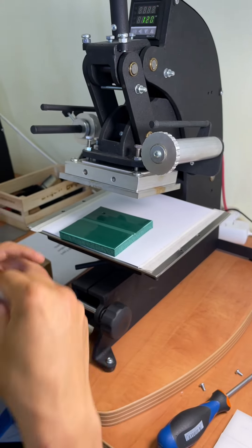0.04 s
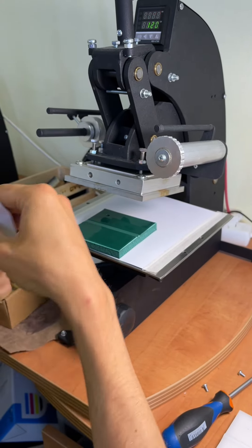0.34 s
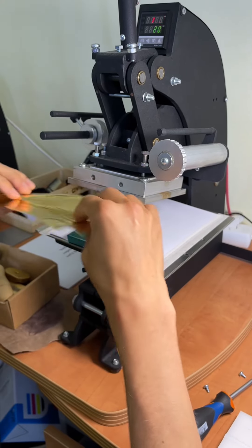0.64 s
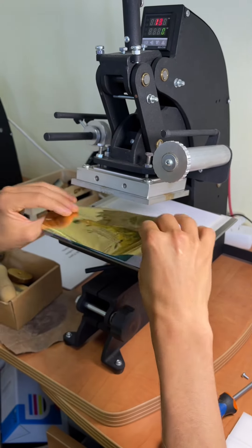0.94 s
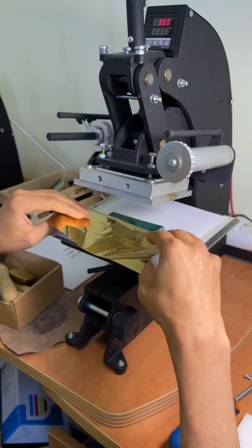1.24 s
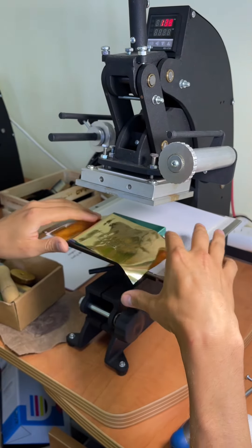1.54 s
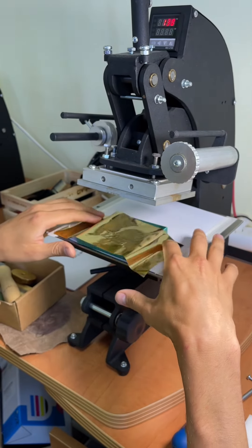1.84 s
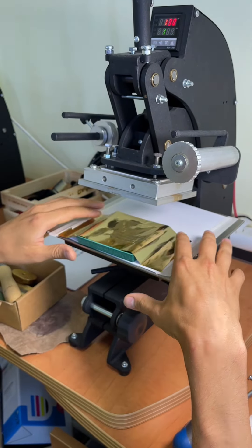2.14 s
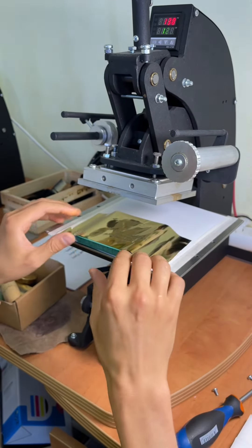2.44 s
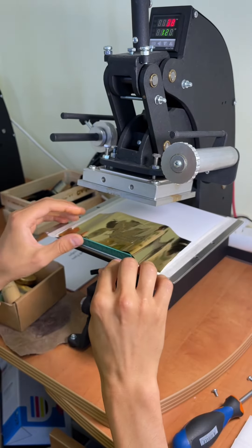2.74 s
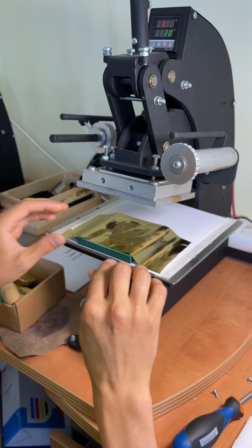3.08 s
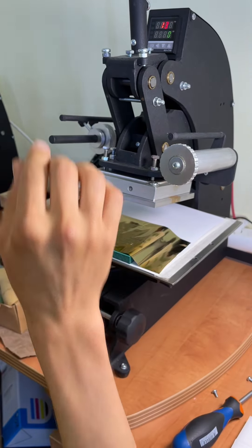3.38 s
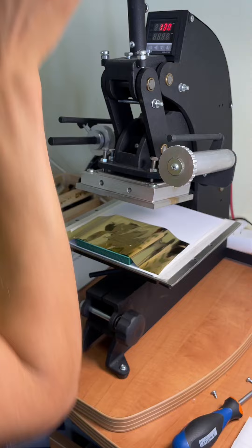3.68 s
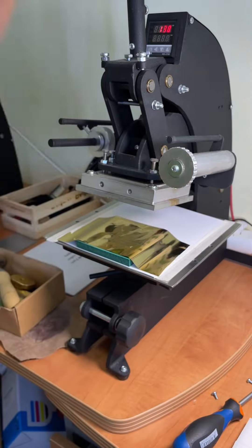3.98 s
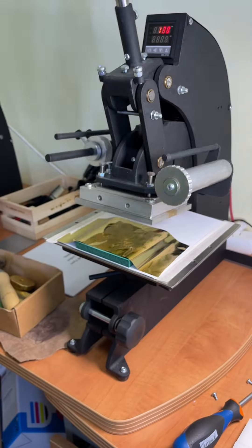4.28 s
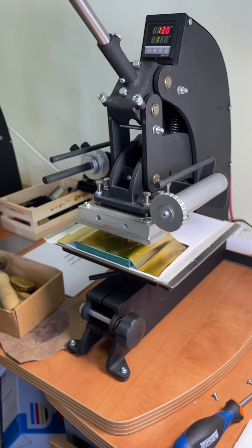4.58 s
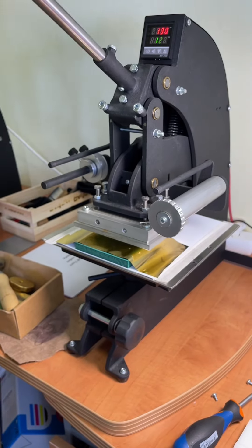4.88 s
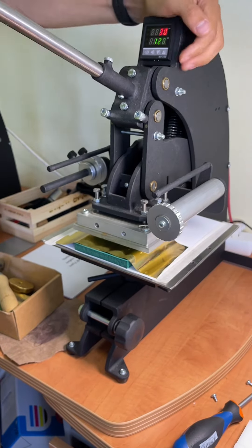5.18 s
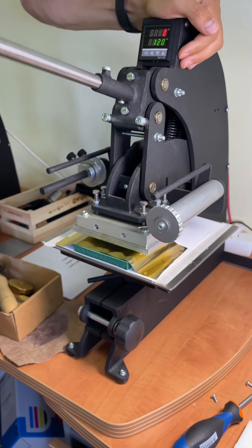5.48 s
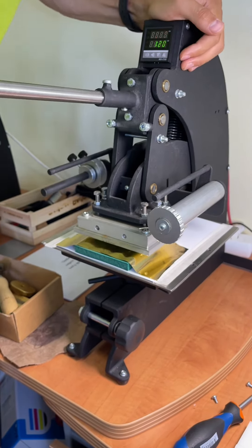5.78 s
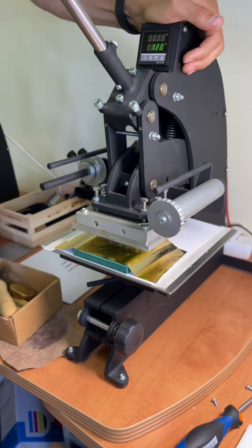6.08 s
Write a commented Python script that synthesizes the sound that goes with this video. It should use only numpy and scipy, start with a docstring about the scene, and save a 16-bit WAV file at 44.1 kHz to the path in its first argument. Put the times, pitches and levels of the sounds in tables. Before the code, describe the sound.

Crisp foil crackling and soft rubbing give way to thuds and loud metallic clacks as a press lever is pulled down.

```python
"""Stamping foil in a hand press

In a small workshop, thin foil is laid on a press. It crinkles and snaps as its creases pop
through, while hands and clothes rub. The lever is pulled and jolts make the bench thud.
The head knocks onto the die (the stamping block), the joints grind and squeak as the load
builds, and the linkage clacks against its stop. A faint hum lies under it all."""
import sys
import numpy as np
from scipy import signal
from scipy.fft import rfft, irfft, next_fast_len
from scipy.io import wavfile

SR = 44100
rng = np.random.default_rng(int(sys.argv[2]) if len(sys.argv) > 2 else 0)


def output_pcm(signal):
    """Save a mono or channel-first signal as 16-bit PCM at the path in sys.argv[1].

    Samples are clipped to [-1, 1] before scaling.
    """
    pcm = np.clip(np.atleast_2d(signal).T, -1, 1) * 32767
    wavfile.write(sys.argv[1], SR, np.round(pcm).astype(np.int16))


N = 274288

# Levels in the tables are relative: gains and filters further on set the final loudness.
# the tone of the workshop air: (frequency [Hz], level [dB])
AIR_COLOUR = [(15, -53.5), (25, -18), (60, -8.5), (160, -18.5), (197, -16.5), (450, -27), (850, -29),
              (1780, -43), (8470, -66), (12300, -54), (14000, -79.5)]
# mains hum and a neighbouring tone: (pitch [Hz], level [dB])
HUM_TONES = [(60, -66.5), (193.8, -69.5)]
# the sheet is picked up, drawn over the die, lowered, lined up, smoothed and let go:
# (time [s], length [s], level [dB])
FOIL_MOVES = [(.008, 0.0028, -48.5), (.08, 0.011, -56.5), (.335, 0.047, -41.5), (.447, 0.017, -38.5),
              (.52, 0.016, -38.5), (.6, 0.093, -45.5), (.74, 0.1, -50.5), (.94, 0.016, -55),
              (1.0, 0.12, -64.5), (1.21, 0.26, -62), (1.32, 0.026, -67), (1.54, 0.017, -57.5),
              (1.748, 0.092, -55), (1.94, 0.085, -66), (2.09, 0.014, -60), (2.19, 0.074, -56.5),
              (2.625, 0.016, -77.5), (2.76, 0.017, -74.5)]
# big creases popping, each in a flurry of small ones: (time [s], snap level [dB], flurry level [dB])
FOIL_SNAPS = [(0.062, -37.5, -58), (.089, -41, -47.5), (0.154, -40, -59), (0.173, -44, -77),
              (.186, -41, -54.5), (0.199, -48, -56), (.259, -48, -59), (0.285, -42, -65),
              (.327, -10.5, -30), (.423, -18.5, -49), (.44, -28, -50), (0.504, -22.5, -42.5),
              (.536, -15, -50), (.547, -17, -55), (0.659, -20, -45.5), (.695, -23, -50),
              (0.811, -21, -39.5), (.915, -44, -75), (1.033, -34, -54), (1.046, -41, -56),
              (1.091, -35, -68), (1.183, -57, -55), (1.534, -32, -50.5), (1.558, -35, -57),
              (1.564, -26, -67), (1.713, -45, -54), (1.733, -31.5, -41), (1.82, -45, -79),
              (1.901, -45, -70), (1.951, -44, -72), (2.009, -38.5, -63), (2.136, -40, -73)]
# borders of the bands in which folds of different size sound: (frequency [Hz])
FOLD_EDGES = [150, 1200, 2400, 3600, 5200, 6800, 8500, 10500, 12200]
# the tone of the foil: (frequency [Hz], level [dB])
FOIL_COLOUR = [(150, -43.5), (400, -8), (1100, -9), (2200, -5.5), (3100, -5.5), (4300, -2.5), (6500, -0.9),
               (8500, 1), (9600, -2.5), (11000, 5.5), (12200, -5.5), (13500, -21.5), (15000, -34.5)]
# a hand brushes off the sheet, later shifts on the press: (time [s], length [s], level [dB])
HAND_BRUSHES = [(2.205, 0.038, -59), (5.98, .2, -61)]
# arm and shirt reach for the lever and pull it: (time [s], level [dB])
ARM_MOVES = [(3.0, -83), (3.19, -67), (3.26, -64), (3.55, -60), (3.85, -59.5), (4.02, -57.5), (4.15, -61),
             (4.24, -50), (4.31, -58.5), (4.68, -65), (4.85, -57.5), (5.15, -61.5), (5.2, -67), (5.38, -65)]
# the tone of rubbing skin and cloth: (frequency [Hz], level [dB])
RUB_COLOUR = [(120, -13.5), (300, 10), (800, 2.5), (1300, 0.5), (2300, 0), (3300, -2.5), (5000, -6.5),
              (7500, -2.5), (9500, -6.5), (11000, 3), (12000, -20), (13000, -44.5), (15000, -63)]
# hands and sheet scuff the bed, hands grip the lever: (time [s], length [s], level [dB], pitch [Hz])
SCUFFS = [(0.853, 0.17, -68, 2440), (2.21, .055, -59.5, 1800), (3.246, 0.041, -51.5, 450),
          (3.252, 0.024, -65, 2300), (3.309, 0.014, -58.5, 1140), (3.468, 0.038, -54.5, 384),
          (3.827, 0.033, -54.5, 604), (4.044, 0.014, -53, 557), (4.127, 0.0071, -53.5, 516),
          (4.227, 0.031, -59, 2200), (4.302, .02, -61, 1680)]
# the bed plate singing: (time [s], level [dB], pitch [Hz], swell time [s])
PLATE_TONES = [(2.235, -53, 303, 0.029)]
# jolts passing from the head down the frame into the bench:
# (time [s], head level [dB], frame level [dB], bench level [dB], head pitch [Hz], frame pitch [Hz])
JOLTS = [(2.251, -53, -79, -60, 295, 141), (3.243, -37.5, -46, -46, 337, 168),
         (3.315, -44, -57, -34.5, 537, 139), (3.904, -34.5, -39.5, -36, 303, 128),
         (4.112, -61, -56, -41, 302, 139), (4.284, -51, -45, -32, 300, 134),
         (4.82, -51, -40.5, -34.5, 330, 165), (4.849, -63, -35.5, -38.5, 332, 132),
         (5.398, -25, -13, -27, 354, 149.4), (5.575, -22, -28, -31, 280, 113),
         (5.58, -30, -15, -26, 250, 108), (5.6, -32, -19, -23.5, 472, 169),
         (5.666, -15.5, -10.5, -34, 416, 176), (5.675, -19, -49, -45, 347, 173),
         (5.718, -22, -30, -32.5, 325, 145), (5.981, -32.5, -26, -34, 315, 160),
         (6.135, -30, -42, -30.5, 334, 138)]
# the notes of the bench top: (pitch [Hz], level [dB], time to fade by 60 dB [s])
BENCH_MODES = [(59.5, -2, 0.52), (155.7, -0.5, 0.28), (178, -2, 0.094), (193, 7.5, 0.14),
               (241.9, 2.5, 0.27), (325, 2.5, 0.15), (474, 4.5, 0.2)]
# the head and its pivots knock on die and guides: (time [s], level [dB], contact time [s])
HEAD_KNOCKS = [(3.175, -55.5, 0.003), (4.258, -46, 0.0062), (4.457, -55, 0.0026), (4.517, -53, 0.0017),
               (4.545, -51, 0.0014), (4.589, -55, 0.003), (5.111, -53.5, 0.028), (5.238, -58, 0.004),
               (5.3925, -39, 0.023), (5.397, -16.5, 0.0029), (5.405, -29.5, 0.012), (5.571, -27, 0.004),
               (5.578, -26, 0.005), (5.596, -33, 0.0025), (5.626, -28, 0.0014), (5.971, -41.5, 0.0078),
               (5.977, -34, 0.014), (6.024, -40.5, 0.0056), (6.135, -42.5, 0.0018), (6.19, -49, 0.0025)]
# the tone of those knocks: (frequency [Hz], level [dB])
HEAD_COLOUR = [(120, -5), (400, -7), (650, 2.5), (1000, 0.5), (1400, 0.5), (1950, 3), (2550, -0.5),
               (3300, -9), (4200, -4), (7500, -14.5), (11000, -15), (12400, -25), (14000, -60),
               (16000, -84)]
# the notes of the steel head: (pitch [Hz], level [dB], time to fade by 60 dB [s])
HEAD_MODES = [(804, 8, 0.24), (865, 10, 0.21), (1003, 19.5, 0.065), (1180, 10, 0.12), (1652, 8.5, 0.37),
              (1691, 8, 0.44), (1953, 22.5, 0.039), (2295, 17.5, 0.046), (2630, 26, 0.018),
              (2910, 10, 0.098)]
# the lever swings down, then eases back: (time [s], length [s], level [dB])
LEVER_SWINGS = [(4.0, 0.496, -63), (4.8, 0.42, -64), (6.05, 0.23, -49)]
# dry steel squeaking: (time [s], level [dB], pitch [Hz], swell time [s])
SQUEAKS = [(4.222, -50, 2410, .012), (4.257, -45, 865, 0.0092), (5.576, -21.5, 2522, 0.0058),
           (5.592, -26, 3320, .0016), (5.62, -27, 10930, 0.011), (5.622, -17, 8420, 0.0046),
           (5.645, -32, 2910, 0.0048), (5.66, -37, 3170, 0.0051)]
# the joints slip as the die takes the load: (time [s], length [s], grind level [dB], crush level [dB])
JOINT_SLIPS = [(5.576, 0.0079, -32, -34), (5.594, 0.0035, -30.5, -24), (5.66, 0.0037, -34, -35)]
# the tone of the grinding joints: (frequency [Hz], level [dB])
GRIND_COLOUR = [(60, -10.5), (200, 0), (500, -2.5), (900, -9), (1800, -12.5), (2900, -16), (4500, -22.5),
                (8000, -43), (13000, -75)]
# the tone of the hiss of crushed foil: (frequency [Hz], level [dB])
CRUSH_COLOUR = [(1000, -8), (3500, -9), (6300, -4), (8000, -2.5), (8550, -2), (9500, -7), (10500, 7),
                (10900, -26), (11500, 5.5), (12600, -34), (14500, -69)]
# the linkage ticks against its stop, lands with its full weight and chatters:
# (time [s], crack level [dB], contact time [s], clack level [dB])
STOP_KNOCKS = [(5.745, -9, 0.0034, -29), (5.7471, -19.5, 0.0024, -3.5), (5.7504, -32, 0.0015, -26),
               (5.754, -15.5, 0.002, -10.5)]
# the tone of the cracks at the stop: (frequency [Hz], level [dB])
STOP_COLOUR = [(150, -49), (600, -9.5), (1000, -2), (1500, -6), (2400, 9), (3300, -7), (4300, 3),
               (5300, -4.5), (7300, 3), (9300, -5), (11300, -1.5), (13000, -23.5), (15500, -38)]
# the notes of the lever: (pitch [Hz], level [dB], time to fade by 60 dB [s])
LEVER_MODES = [(736, -11.5, 0.24), (968, 1.5, 0.086), (1810, 4.5, 0.23), (2128, -10, .13), (2230, -4, .1),
               (2440, -6, .11), (2550, 4, 0.1), (2650, -14, 0.12), (3240, 2.5, 0.12), (8060, -14, 0.048)]
# how long the room echoes: (frequency [Hz], time to fade by 60 dB [s])
ROOM_DECAY = [(80, 0.52), (250, 0.48), (700, 1), (2000, 0.41), (6000, 0.46), (12000, 0.25)]
# how far the two microphone openings are out of step: (frequency [Hz], phase [radians])
PORT_PHASE = [(0, 0), (2330, 0.2), (3010, 1.1), (4130, 0.9), (4570, 1.9), (5250, 5.0), (5680, 6.2),
              (6200, 6.4), (8350, 9.2), (9560, 9.5), (11800, 12.3), (13800, 12.6), (14000, 13.2),
              (15900, 15.9)]

TIME = np.arange(N) / SR


def amp(db):
    """Turn decibels into a gain to multiply by."""
    return 10 ** (np.asarray(db) / 20)


def unit(x):
    """Scale a sound to an average strength (rms) of 1."""
    return x / np.sqrt(np.mean(x ** 2))


def add(track, s, sound):
    """Mix a sound into a track, starting at s seconds."""
    start = max(int(s * SR), 0)
    track[start:start + len(sound)] += sound[:max(N - start, 0)]


def band(x, low_hz, high_hz, order=2):
    """Keep what lies between two frequencies."""
    return signal.sosfilt(signal.butter(order, [low_hz, high_hz], "band", fs=SR, output="sos"), x)


def cut_bass(x, hz, order):
    """Weaken what lies below a frequency."""
    return signal.sosfilt(signal.butter(order, hz, "high", fs=SR, output="sos"), x)


def through(x, response):
    """Pass a sound through an object, given its response to one click (scaled to energy 1)."""
    return signal.oaconvolve(x, response / np.linalg.norm(response))[:N]


def colour(x, points, size=2048):
    """Shape a sound's tone to follow (frequency [Hz], level [dB]) points."""
    hz, db = np.transpose(points)
    bins = np.arange(size // 2 + 1) * SR / size
    gains = amp(np.interp(np.log(bins + 1), np.log(hz), db))
    cepstrum = irfft(np.log(gains))
    # keeping only the first half makes the filter answer after a click, never before it
    fold = 1 + np.sign(size / 2 - np.arange(size))
    fold[0] = 1
    return through(x, irfft(np.exp(rfft(cepstrum * fold))))


def waver(per_s):
    """A smooth random wobble of about 1 either way."""
    knots = np.arange(0, N / SR + 1, 1 / per_s)
    return unit(np.interp(TIME, knots, rng.standard_normal(len(knots))))


def gesture(s, length_s, attack_s, release_s):
    """A gain that rises to 1 at time s, holds and dies away."""
    return np.exp(-np.maximum(s - TIME, 0) / attack_s - np.maximum(TIME - s - length_s, 0) / release_s)


def movements(rows, attack_s=0.019, release_s=0.017):
    """The speed of a hand as a gain, from (time [s], length [s], level [dB]) rows."""
    return sum(amp(db) * gesture(s, length_s, attack_s, release_s) for s, length_s, db in rows)


def grains(per_s, spread_db):
    """Random clicks of uneven size."""
    size = amp(spread_db * np.clip(rng.standard_normal(N), -2, 2))
    return unit((rng.random(N) < per_s / SR) * size * rng.choice([-1, 1], N))


def burst(decay_s, size=8192):
    """A rough contact: a fading spray of tiny hits, equally strong at every frequency."""
    spray = rng.choice([-1, 1], size) * np.exp(-TIME[:size] / decay_s)
    flattened = irfft(np.exp(1j * np.angle(rfft(spray))))
    return np.linalg.norm(spray) * flattened[:size // 2]


def swells(rows):
    """Short tones that grow and fade, from (time [s], level [dB], pitch [Hz], swell time [s]) rows."""
    track, t = np.zeros(N), TIME[:SR // 4]
    for s, db, hz, swell_s in rows:
        envelope = (t / swell_s * np.exp(1 - t / swell_s)) ** 2
        add(track, s, amp(db) * envelope * np.sin(2 * np.pi * hz * t))
    return track


def ring(x, modes):
    """A shaken object rings with its own fading notes, called modes."""
    t = TIME[:SR // 2]
    notes = sum(amp(db) * np.sin(2 * np.pi * hz * t) * np.exp(-np.log(1000) * t / fade_s)
                for hz, db, fade_s in modes)
    return through(x, notes)


def cracks(rows, crack_colour):
    """Metal meets metal: one rough crack for each (time [s], level [dB], contact time [s]) row."""
    track = np.zeros(N)
    for s, db, contact_s in rows:
        add(track, s, amp(db) * burst(contact_s))
    return colour(track, crack_colour)


def ringing(blows, modes):
    """A struck part rings on after each (time [s], level [dB]) blow."""
    track = np.zeros(N)
    for s, db in blows:
        add(track, s, [amp(db)])
    return band(ring(track, modes), 67, 8700, order=4)


def background(air_db=-60.5, hum_gain_db=-1):
    """Low, steady workshop air with a faint hum."""
    air = amp(air_db) * unit(colour(rng.standard_normal(N), AIR_COLOUR, size=8192))
    hum = sum(amp(db) * np.sqrt(2) * np.sin(2 * np.pi * hz * TIME) for hz, db in HUM_TONES)
    return air + amp(hum_gain_db) * hum


def creasing(rise_s=0.0049, fall_s=0.0074):
    """How busily the sheet creases: under moving fingers, and in a flurry around each snap."""
    flurries = sum(amp(db) * gesture(s, 0, rise_s, fall_s) for s, _, db in FOIL_SNAPS)
    return movements(FOIL_MOVES) + flurries


def foil(crinkle_db=-1.5, clump_db=0.7, shift_db=3.5, tick_db=-41, snap_db=-5):
    """Tiny creases crackle in clumps as the sheet bends; bigger ones pop through one by one."""
    busy = creasing()
    clumps = amp(crinkle_db + clump_db * waver(per_s=200))
    creases = clumps * busy * grains(per_s=2000, spread_db=0.5)
    # the tone shifts as the folds change size
    creases = sum(amp(shift_db * waver(per_s=45)) * band(creases, low, high, order=3)
                  for low, high in zip(FOLD_EDGES, FOLD_EDGES[1:]))
    # lone crisp ticks stand out when the sheet is barely moved
    pops = amp(tick_db) * np.sqrt(busy) * grains(per_s=84, spread_db=8)
    # only the big snaps, added next, reach the highest treble
    creases, pops = band([creases, pops], FOLD_EDGES[0], FOLD_EDGES[-1], order=6)
    for s, db, _ in FOIL_SNAPS:
        add(pops, s, amp(db + snap_db) * burst(decay_s=0.0009))
    # a single crease gives off little bass
    return colour(creases + cut_bass(pops, hz=3500, order=1), FOIL_COLOUR)


def rubbing(arm_db=2.5, uneven_db=1.0, brush_db=9.0, fingertip_db=-44):
    """Skin and cloth slide with a fine, grainy hiss under uneven pressure."""
    times, levels = np.transpose(ARM_MOVES)
    arm_speed = amp(np.interp(TIME, times, levels, left=-np.inf, right=-np.inf))
    arm = amp(arm_db + uneven_db * waver(per_s=49)) * arm_speed
    brushes = amp(brush_db) * movements(HAND_BRUSHES)
    # the fingertips' hiss grows more slowly than the crinkling they cause
    fingertips = amp(fingertip_db) * np.sqrt(creasing())
    return colour((arm + brushes + fingertips) * grains(per_s=9000, spread_db=4.0), RUB_COLOUR)


def scuffing(width_octaves=0.82, attack_s=0.0032, release_s=0.0054):
    """Short, coarse scrapes, each at the pitch of the part that is touched."""
    track, edge = np.zeros(N), 2 ** (width_octaves / 2)
    for s, length_s, db, hz in SCUFFS:
        scrape = unit(band(grains(per_s=610, spread_db=2.5), hz / edge, hz * edge))
        track += amp(db) * gesture(s, length_s, attack_s, release_s) * scrape
    return track


def bed_plate():
    """The plate under the foil sings briefly as the hand slides off it."""
    return swells(PLATE_TONES)


def thuds(thud_db=-2.5, ring_db=-20, roughness=0.39, shudder_db=6.5, head_swell_s=0.0033,
          frame_lag_s=0.00943, frame_swell_s=0.0084,
          bench_lag_s=0.0209, bench_swell_s=0.018, bench_hz=72.7):
    """Each jolt rocks the head, then the heavy frame, then the bench, whose top rings on."""
    head = swells([(s, db, hz, head_swell_s) for s, db, _, _, hz, _ in JOLTS])
    frame = swells([(s + frame_lag_s, db, hz, frame_swell_s) for s, _, db, _, _, hz in JOLTS])
    bench = swells([(s + bench_lag_s, db, bench_hz, bench_swell_s) for s, _, _, db, _, _ in JOLTS])
    # loose parts chatter while the frame moves
    chatter = unit(colour(rng.standard_normal(N), [(200, 5), (500, -9), (1500, -54), (6000, -110)]))
    # the frame shudders faintly while the lever swings
    shudder = colour(movements(LEVER_SWINGS) * rng.standard_normal(N),
                     [(25, -17.5), (65, 1.5), (300, -16), (900, -25), (3000, -79)])
    jolts = amp(thud_db) * (head + frame + bench) * (1 + roughness * chatter)
    rocking = jolts + amp(shudder_db) * shudder
    # the small bench gives off little deep bass
    return band(rocking + amp(ring_db) * ring(rocking, BENCH_MODES), 41, 4000, order=1)


def head_knocks(crack_db=1, ring_db=19):
    """The steel head knocks on die and guides; returns its cracks and its ringing."""
    crack = amp(crack_db) * cracks(HEAD_KNOCKS, HEAD_COLOUR)
    blows = [(s, db) for s, db, _ in HEAD_KNOCKS]
    return crack, amp(ring_db) * ringing(blows, HEAD_MODES)


def pivots(tick_db=-17):
    """The pivots tick at random while the lever swings."""
    ticks = movements(LEVER_SWINGS) * grains(per_s=29, spread_db=3)
    return amp(tick_db) * colour(ticks, HEAD_COLOUR)


def squeaking(squeak_db=-1, roughness=0.31):
    """Dry steel squeaks under load in short, rough tones."""
    return amp(squeak_db) * swells(SQUEAKS) * (1 + roughness * waver(per_s=990))


def clamping(grind_db=-1, crush_db=-2, attack_s=0.0042, grind_release_s=0.052, crush_release_s=0.019):
    """The joints slip and grind while the foil hisses as it is crushed on the die."""
    sliding = sum(amp(db) * gesture(s, length_s, attack_s, grind_release_s)
                  for s, length_s, db, _ in JOINT_SLIPS)
    squeezing = sum(amp(db) * gesture(s, length_s, attack_s, crush_release_s)
                    for s, length_s, _, db in JOINT_SLIPS)
    grind = amp(grind_db) * sliding * grains(per_s=1400, spread_db=1.5)
    crush = amp(crush_db) * squeezing * grains(per_s=7200, spread_db=2)
    return colour(grind, GRIND_COLOUR) + colour(crush, CRUSH_COLOUR)


def linkage_stop(crack_db=3, clack_hz=2373, clack_swell_s=0.00084, ring_db=4):
    """The linkage hits its stop; returns the cracks with their short clacks, and the lever's ring."""
    crack = amp(crack_db) * cracks([row[:3] for row in STOP_KNOCKS], STOP_COLOUR)
    clack = swells([(s, db, clack_hz, clack_swell_s) for s, _, _, db in STOP_KNOCKS])
    landing_s = STOP_KNOCKS[1][0]  # the heavy second contact sets the lever ringing
    return crack + clack, ringing([(landing_s, ring_db)], LEVER_MODES)


def room(x, early_db=5, early_s=0.01, gap_s=0.0014, size=32768):
    """Dense echoes from bench and walls, each octave fading at its own rate."""
    t, spectrum = TIME[:size], rfft(rng.standard_normal(size))
    bins = np.arange(len(spectrum)) * SR / size
    octave = np.round(np.log2(np.maximum(bins, 64)))
    hz, fade_s = np.transpose(ROOM_DECAY)
    tail = sum(irfft(spectrum * (octave == k))
               * np.exp(-np.log(1000) * t / np.interp(k, np.log2(hz), fade_s))
               for k in np.unique(octave))
    # echoes from the bench are strong and die away first
    early_boost = 1 + amp(early_db) * np.exp(-t / early_s)
    return through(x, tail * (t > gap_s) * early_boost)


def roaming(x, moves_per_s=14, spots=4):
    """Echoes of a sound that drifts between several spots in the room."""
    shares = np.array([waver(per_s=moves_per_s) for _ in range(spots)])
    return sum(room(x * share) for share in shares / np.linalg.norm(shares, axis=0))


def scene(hand_room_db=-7.5, press_room_db=-10, ring_room_db=-17, thud_room_db=-17, wide_db=-6):
    """Hands and press in one small room; only the echoes differ between left and right."""
    hands = foil() + rubbing() + scuffing() + bed_plate()
    head_crack, head_ring = head_knocks()
    stop_crack, lever_ring = linkage_stop()
    press = head_crack + pivots() + squeaking() + clamping() + stop_crack
    rings = head_ring + lever_ring
    thumps = thuds()
    # what the moving hands and the standing press send into the room
    moving = amp(hand_room_db) * hands
    standing = amp(press_room_db) * press + amp(ring_room_db) * rings + amp(thud_room_db) * thumps
    mid = hands + press + rings + thumps + roaming(moving) + room(standing) + background()
    # long, low waves reach left and right alike
    side = amp(wide_db) * cut_bass(room(moving + standing), hz=480, order=3)
    return np.array([mid + side, mid - side])


def record(dry, top_hz=15800):
    """A phone's two microphone openings fall out of step towards the treble; the very top is cut."""
    hz, radians = np.transpose(PORT_PHASE)
    size = next_fast_len(N + SR // 10)
    turn = np.interp(np.arange(size // 2 + 1) * SR / size, hz, radians)
    half_turns = np.exp(.5j * np.array([turn, -turn]))  # left and right turn opposite ways
    ports = irfft(rfft(dry, size) * half_turns, size)[:, :N]
    treble_cut = signal.ellip(10, .2, 95, top_hz, fs=SR, output="sos")
    return signal.sosfilt(treble_cut, np.clip(ports, -1, 1))


dry = scene()
out = record(dry)
output_pcm(out)
```